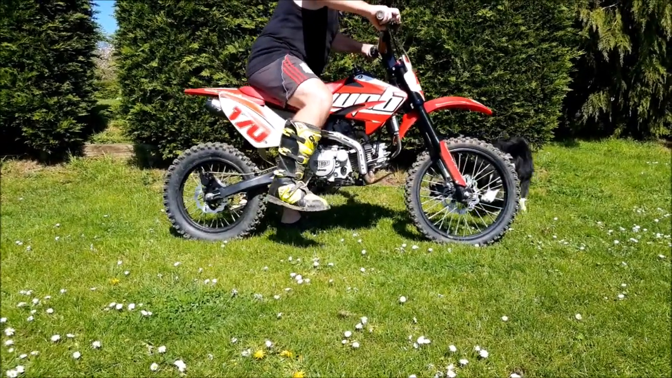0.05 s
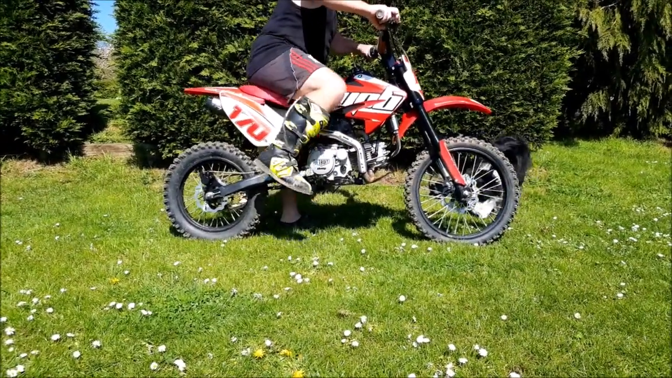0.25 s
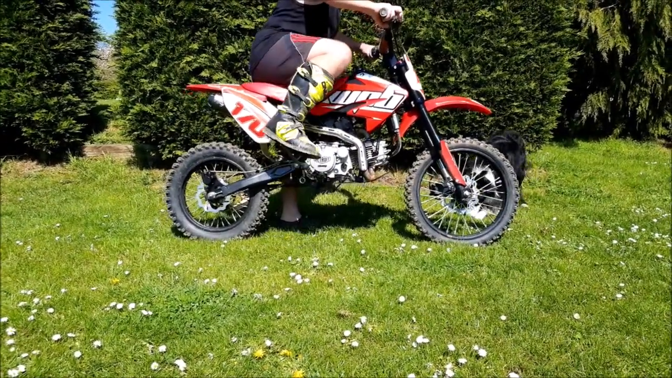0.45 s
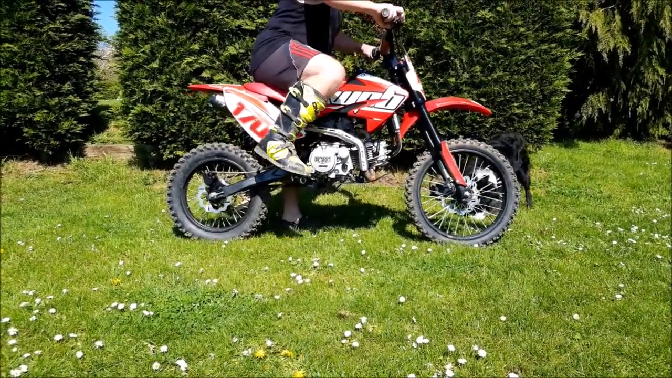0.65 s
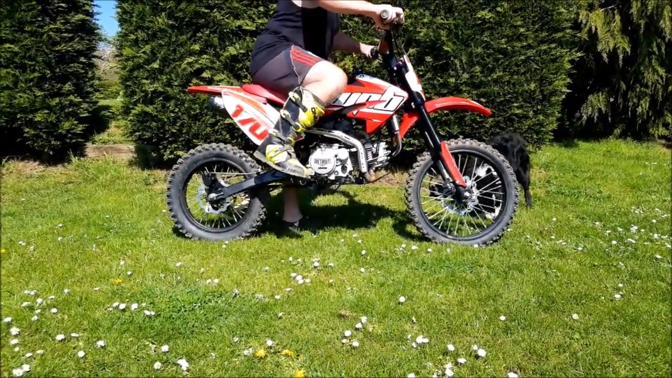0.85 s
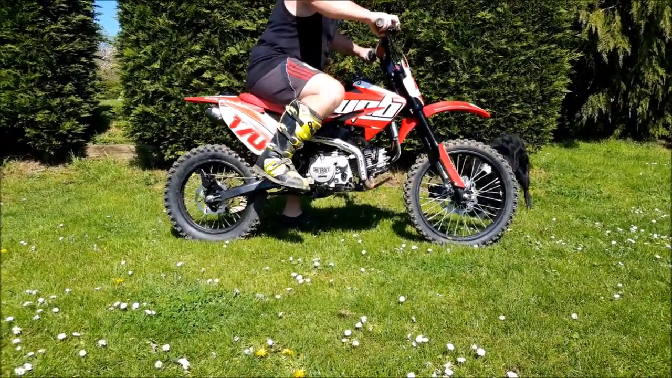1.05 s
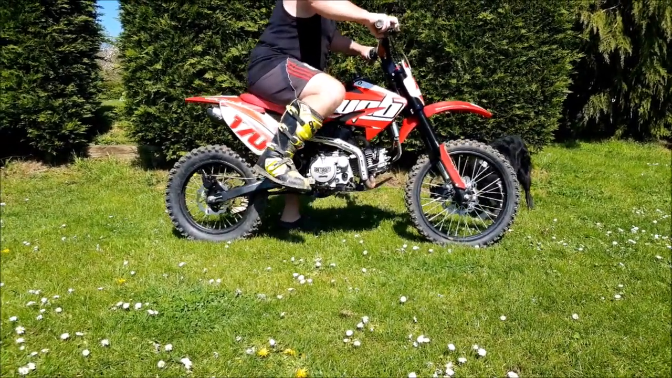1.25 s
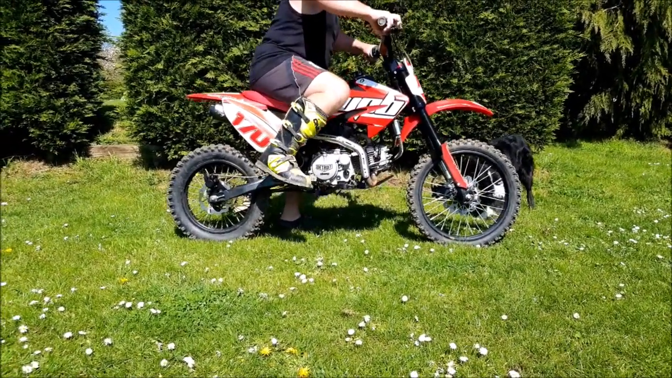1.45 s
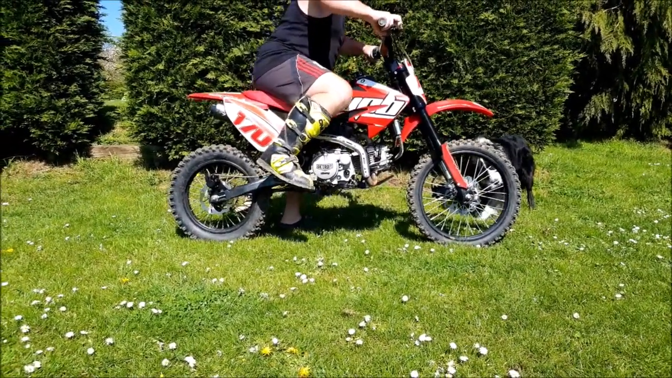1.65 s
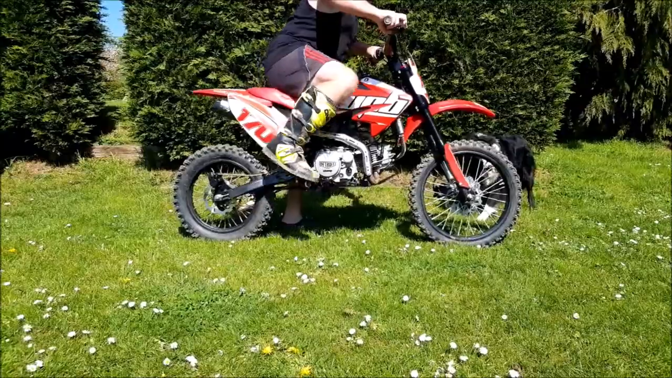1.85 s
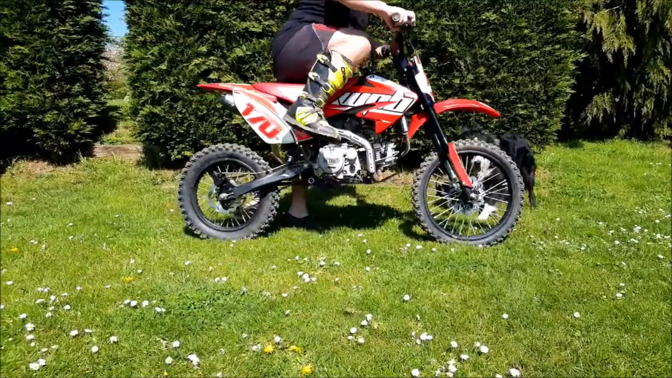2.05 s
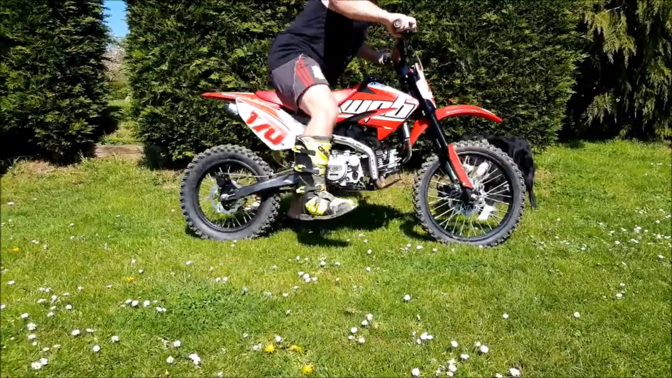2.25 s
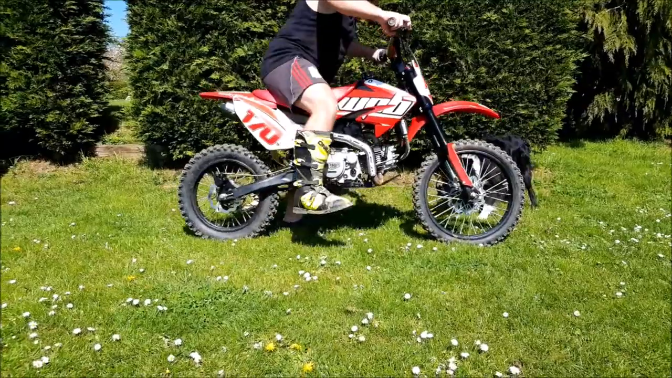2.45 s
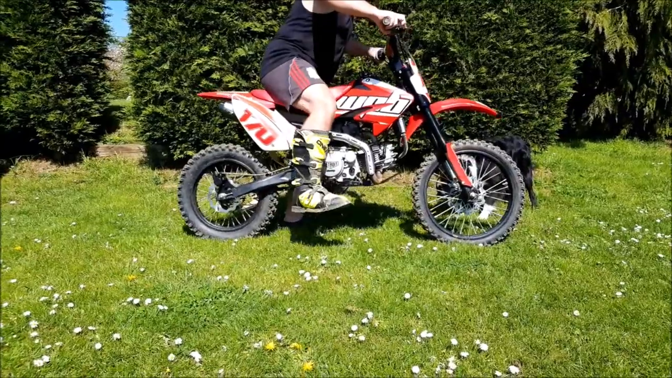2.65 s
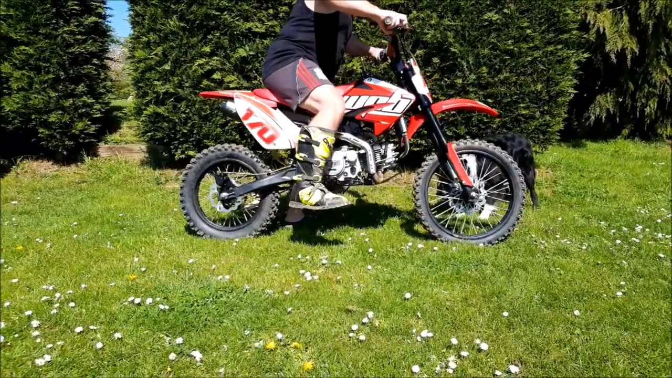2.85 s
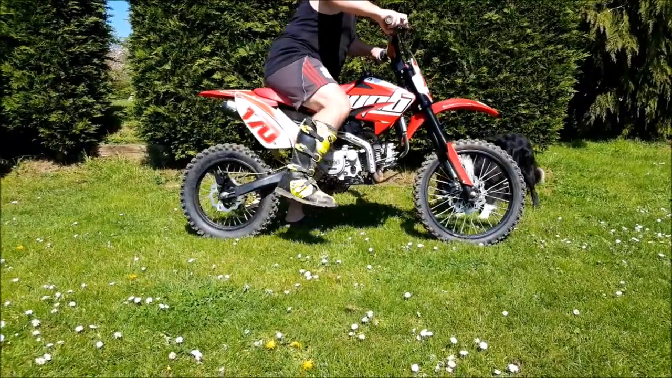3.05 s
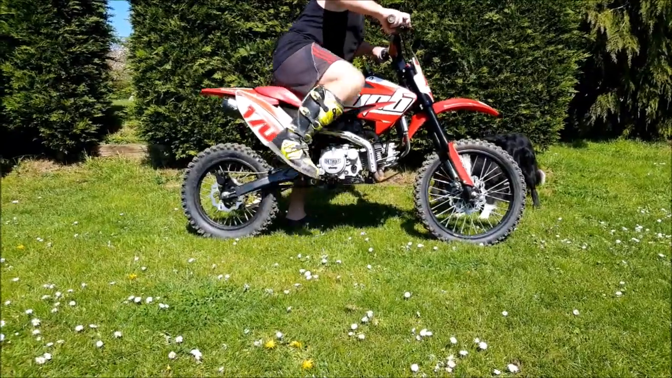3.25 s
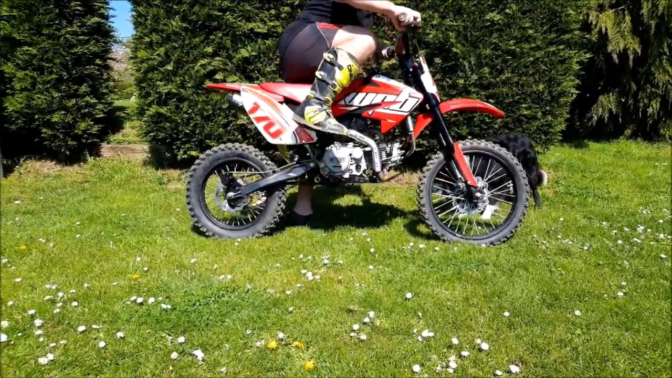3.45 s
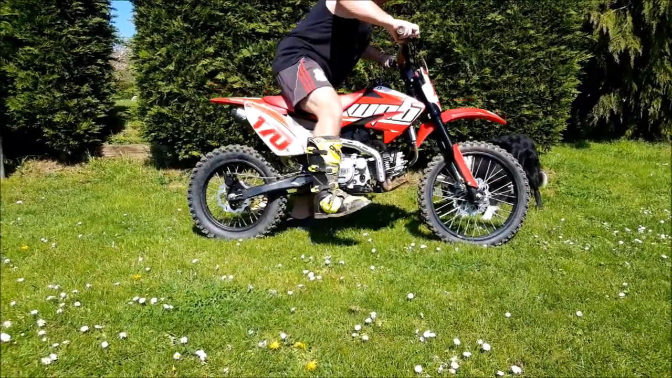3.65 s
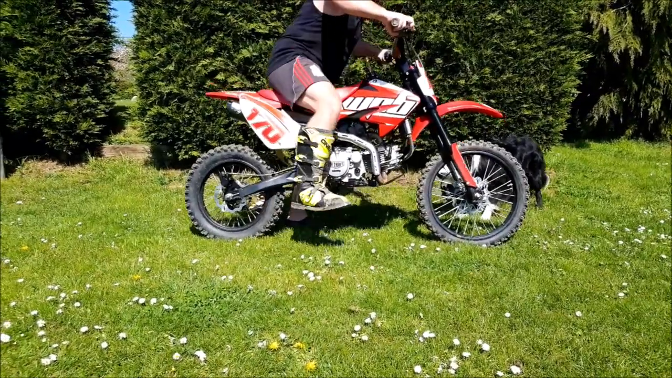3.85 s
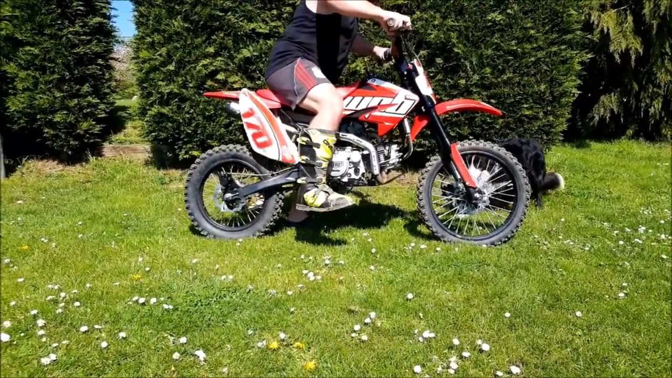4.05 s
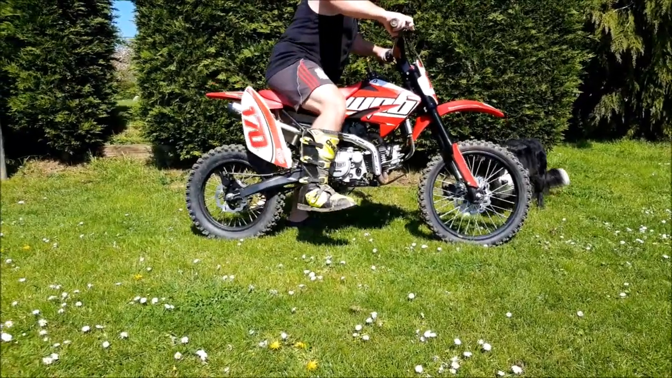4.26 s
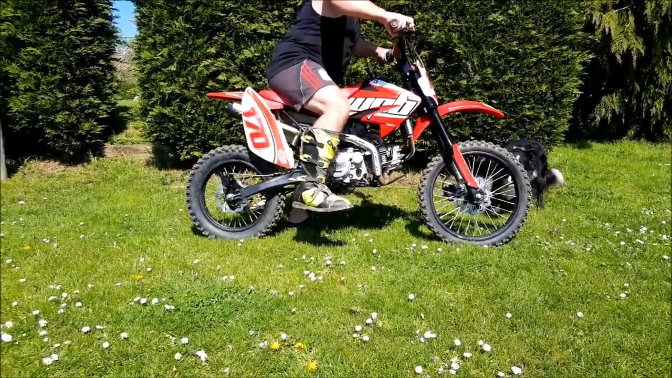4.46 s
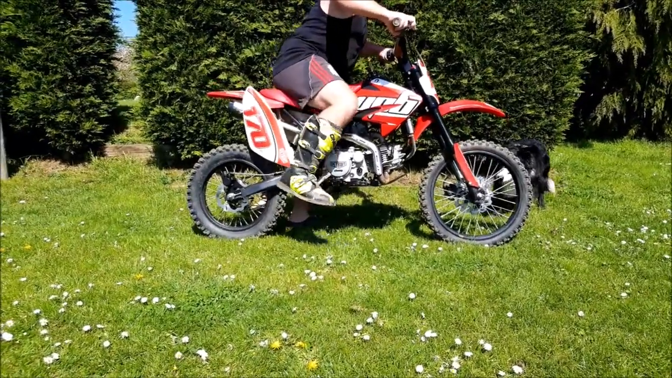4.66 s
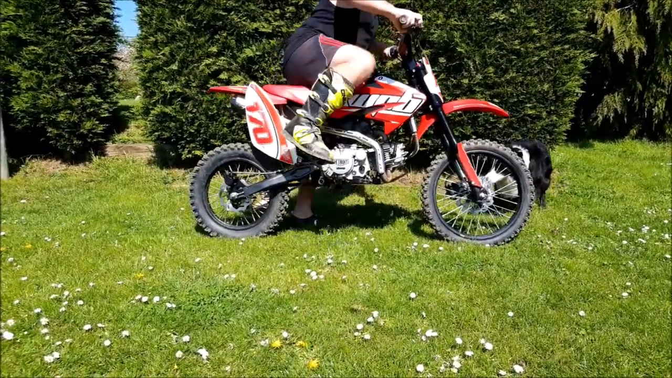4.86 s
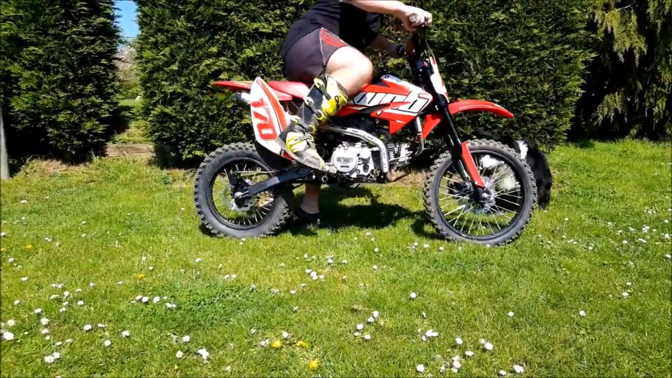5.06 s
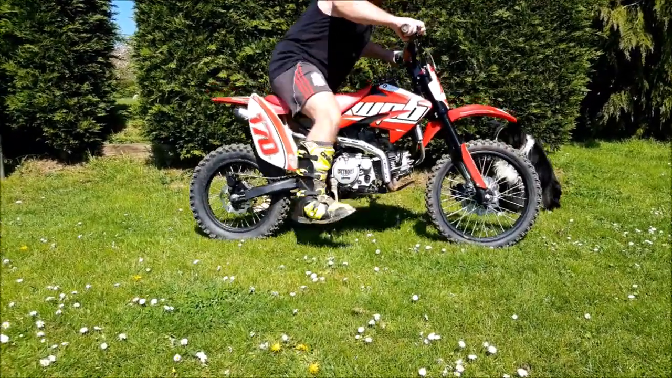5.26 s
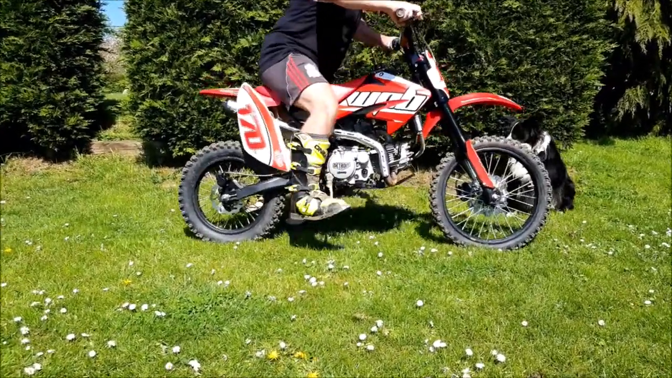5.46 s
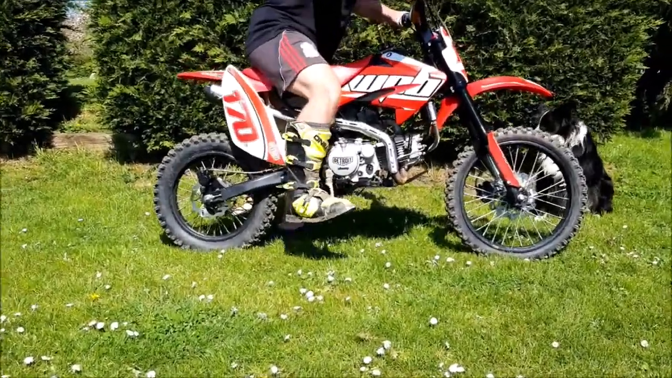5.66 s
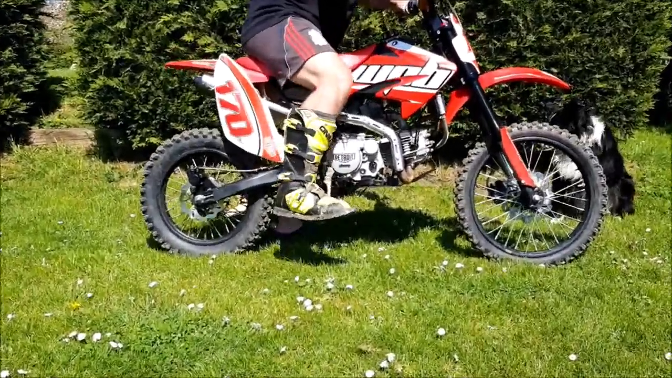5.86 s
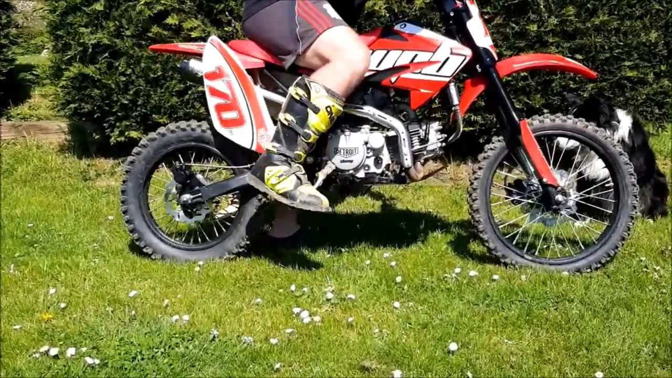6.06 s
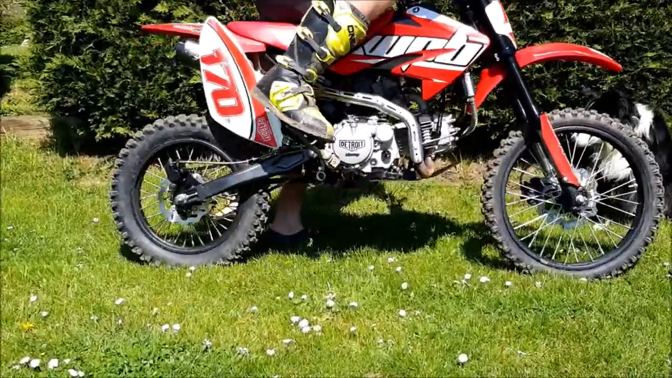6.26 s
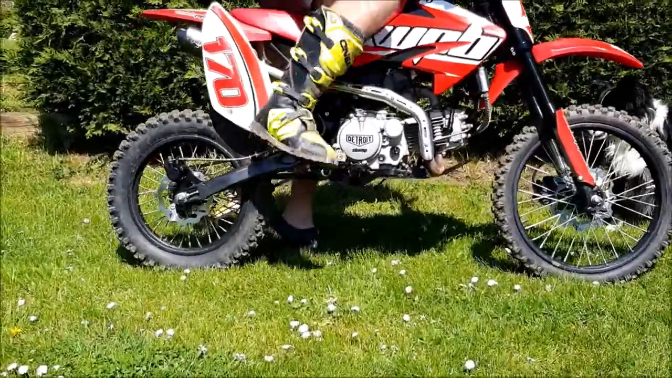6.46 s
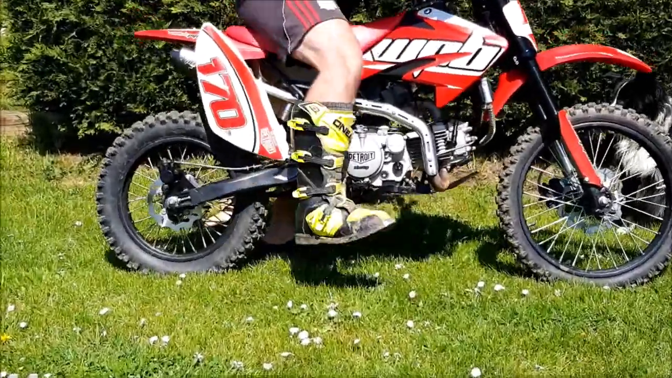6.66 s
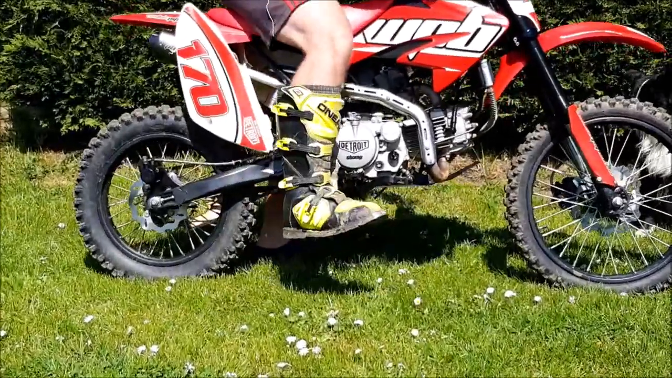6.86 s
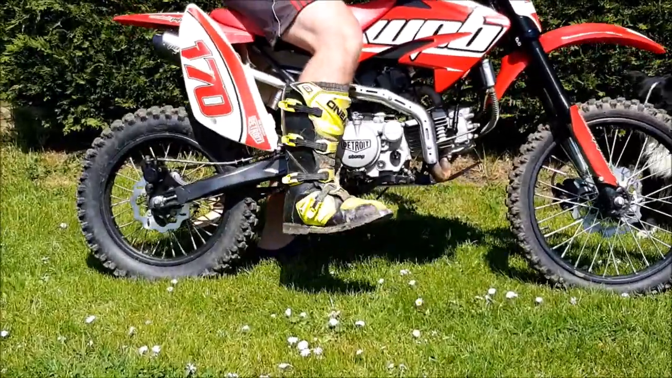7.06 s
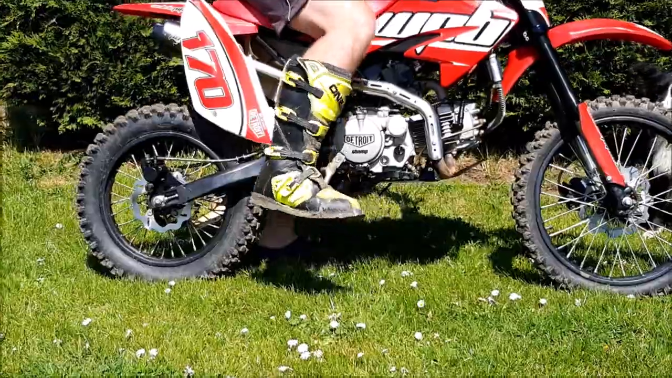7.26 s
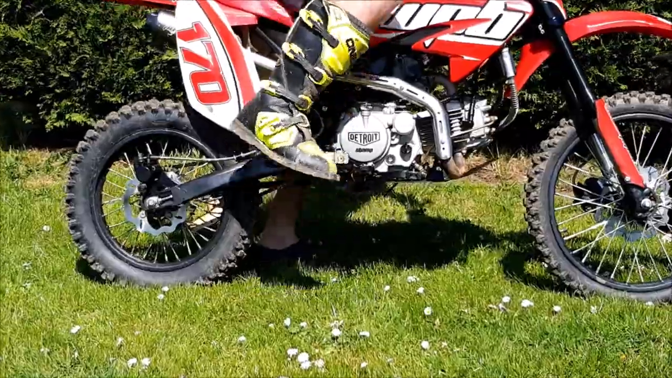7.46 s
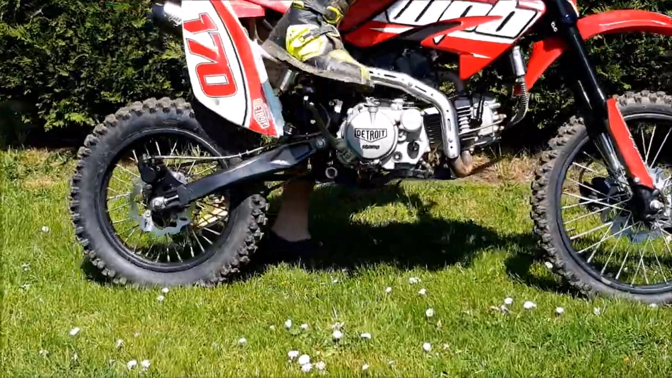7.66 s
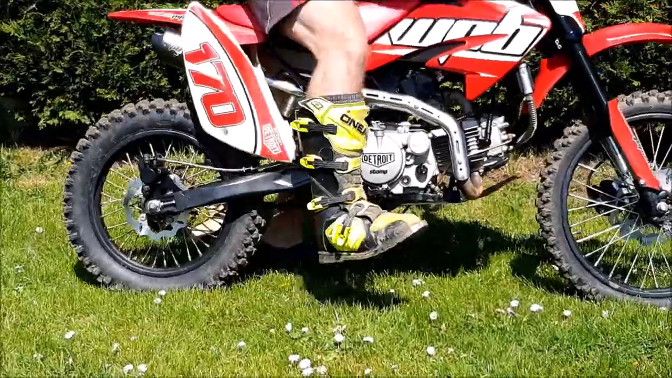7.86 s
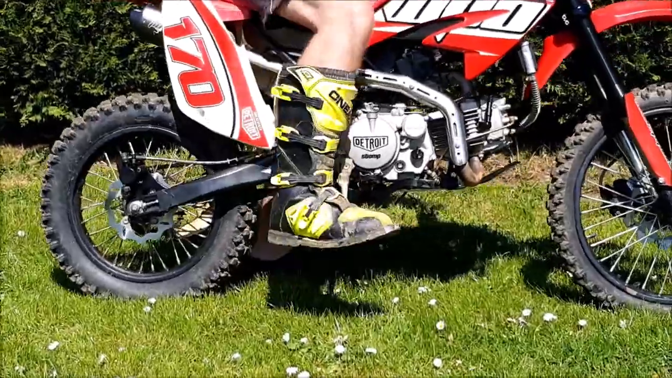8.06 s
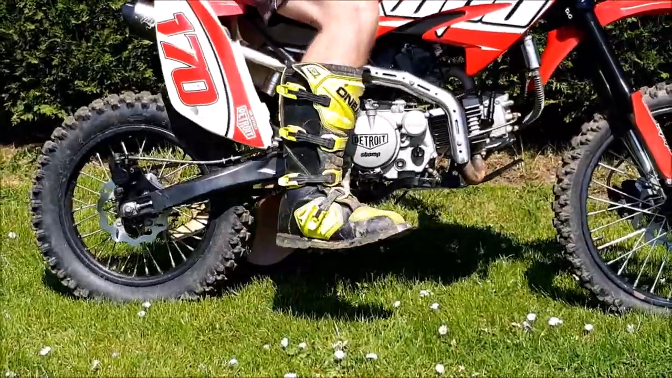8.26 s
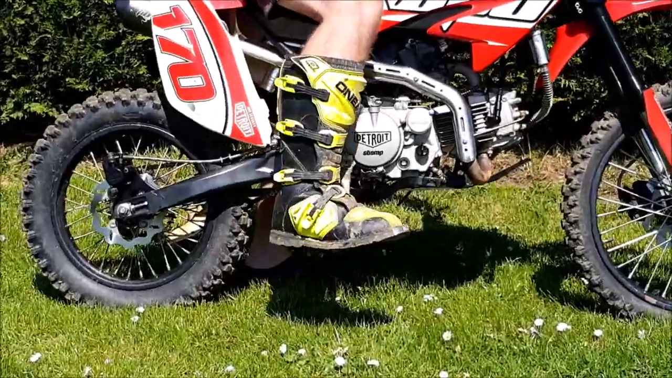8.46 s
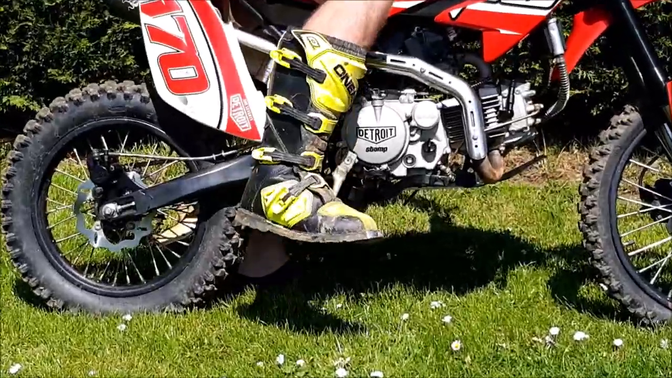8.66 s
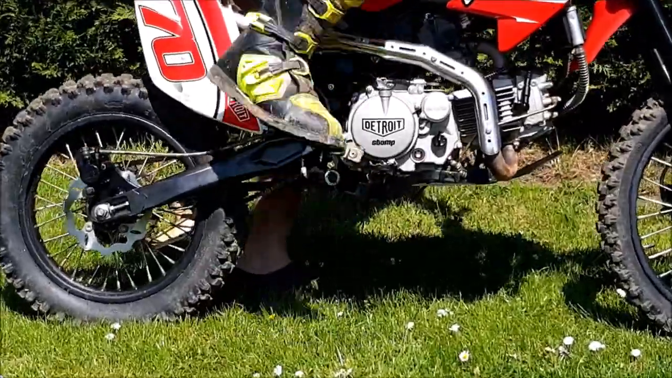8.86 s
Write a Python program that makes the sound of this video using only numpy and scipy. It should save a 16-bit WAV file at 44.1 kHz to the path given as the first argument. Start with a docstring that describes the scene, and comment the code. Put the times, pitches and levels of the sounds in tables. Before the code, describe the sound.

Five kick-starter strokes on a small motorcycle: metal clack, gear whirr, two hollow unfired exhaust gasps, quick stop, with small birds whistling outdoors.

```python
"""Kick-starting a pit bike in vain

A rider kicks over a small single-cylinder pit bike five times on a lawn; it never fires.
Each kick: the starter pawl clacks in, gears and chain whirr (filtered noise and tiny contacts), and two
unfired cycles gasp through the silencer (air surges into resonances) before the crank stops.
The lever ticks between kicks; small birds (gliding whistles) sing over a distant low rumble (noise).
"""
import sys
import numpy as np
from scipy import signal
from scipy.fft import rfft, irfft
from scipy.io import wavfile

SR = 44100
rng = np.random.default_rng(int(sys.argv[2]) if len(sys.argv) > 2 else 0)


def store_pcm(level_fs):
    """Save levels as 16-bit WAV."""
    pcm = np.round(np.clip(level_fs, -1, 1) * 32767).astype(np.int16)
    wavfile.write(sys.argv[1], SR, np.atleast_2d(pcm).T)


N = 392931
TIME = np.arange(N) / SR

# the five kicks: [pawl catches t/s, pawl level/dB, slack knock level/dB, extra whirr under the boot's shove/dB,
# gear whirr level/dB, first gasp t/s, second gasp t/s, gasp level/dB]
KICK_PLAN = [(2.172, -21.5, -19, 3, -41, 2.2662, 2.3552, -1),
             (3.538, -27, -32, 0, -40, 3.6266, 3.7132, -.7),
             (5.064, -28.5, -28, -2, -39.5, 5.1688, 5.2584, -1),
             (6.460, -31, -29, -2, -40.5, 6.5519, 6.6406, -.3),
             (7.728, -32.5, -35, -3, -41, 7.8211, 7.9077, .7)]
# dense overtones of the bike when tapped: [f/Hz, level/dB]
CASING_TONE = [(100, -8.5), (250, 13.5), (400, -8.5), (900, 11), (1200, -15.5), (2000, -11), (3500, -4),
               (5000, -13.5), (6500, -3.5), (9000, -23.5), (11000, -19), (14500, -30)]
SLACK_S = .036  # from the pawl catching until the drive has taken up its slack


def from_db(db):
    """Turn decibels into a gain."""
    return 10 ** (np.asarray(db) / 20)


def rms_one(x):
    """Scale to rms 1."""
    return x / np.sqrt(np.mean(x ** 2) + 1e-20)


def unit(impulse):
    """Scale a response so that it keeps the power of white noise."""
    return impulse / np.sqrt(np.sum(impulse ** 2, axis=-1, keepdims=True))


def in_time(rows):
    """Read each column of a curve at every sample."""
    s, *columns = np.transpose(rows)
    return [np.interp(TIME, s, column) for column in columns]


def drift(per_s):
    """A random wander that heads for a new value per_s times a second."""
    steps = rng.standard_normal(20000)
    return np.interp(TIME * per_s, np.arange(len(steps)), steps)


def response(spectrum, size=4096):
    """An impulse response with the given spectrum and its energy as early as possible (minimum phase)."""
    hz, db = np.transpose(spectrum)
    grid = np.maximum(np.arange(size // 2 + 1) * SR / size, 1)
    grid_db = np.interp(np.log(grid), np.log(hz), db)
    cepstrum = irfft(np.log(from_db(grid_db)))
    # folding the second half onto the first makes the response causal
    cepstrum[1:size // 2] *= 2
    cepstrum[size // 2 + 1:] = 0
    return irfft(np.exp(rfft(cepstrum)))


def through(x, impulse):
    """Pass channels through an impulse response."""
    wet = signal.oaconvolve(np.atleast_2d(x), np.atleast_2d(impulse), axes=-1)
    return wet[:, :x.shape[-1]]


def low_pass(x, cutoff_hz):
    """Dull a sound gently above the cutoff."""
    return signal.sosfilt(signal.butter(1, cutoff_hz, fs=SR, output="sos"), x)


def spread(pair):
    """Two unrelated signals to left and right: alike in the bass, apart in the treble."""
    # likeness of the two ears: [f/Hz, side minus mid level/dB]
    ear_width = [(30, -8), (70, -15), (200, -15), (400, -17), (1270, -18), (2330, -13), (4280, 0),
                 (8000, -1), (14500, 0)]
    side = through(pair[1], response(ear_width))
    return pair[0] + side * [[1], [-1]]


def grains(per_s, size_db):
    """Two trains of tiny contacts of uneven size, at shared moments; rms 1."""
    size = from_db(size_db * np.minimum(rng.exponential(1, N), 4))
    touching = rng.random(N) < per_s / SR
    return rms_one(touching * size * rng.standard_normal((2, N)))


def bike_body(spectrum, ring_db, vary_db=0, size=4096):
    """The bike's answer to a tap: a short crack plus ringing metal; each place of contact favours other modes."""
    # ringing of crankcase, lever and frame: [f/Hz, width/Hz, level/dB]
    metal_modes = [(434.5, 30, 2.5), (700, 414, -3), (935, 49, 9.5), (1377, 36, 2.5), (1502, 14, 0.5),
                   (1844, 68, 2.5), (2284, 27, -7.5), (2694, 38, -0.5), (3160, 79, 5.5), (3840, 46, 0.5),
                   (4130, 64, -4.5)]
    t = np.arange(size) / SR
    place_db = rng.standard_normal(len(metal_modes)) * vary_db
    ringing = 0
    for k, (hz, width, db) in enumerate(metal_modes):
        gain = (-1) ** k * from_db(db + place_db[k]) * width
        ringing = ringing + gain * np.exp(-np.pi * width * t) * np.cos(2 * np.pi * hz * t)
    return unit(unit(response(spectrum)) + from_db(ring_db) * unit(ringing))


def exhaust(repeat_s=0.12, repeat_db=-31):
    """Each unfired cycle sucks air back through the exhaust valve and sets the silencer booming."""
    # air surges as the exhaust valve opens, stands open and shuts:
    # [t/s from the gasp, signed air volume (relative), width/s]
    air_surges = [(-.0032, -0.41, 0.0021), (.0096, -0.29, 0.0015), (.017, .06, .001),
                  (0.0296, 0.038, 0.00089)]
    # silencer resonances: [f/Hz, signed gain, time to fall by 60 dB/s]
    silencer_modes = [(76.7, 0.48, 0.067), (97.68, 0.97, 0.38), (191.8, -1.44, 0.18), (227, -0.58, 0.098),
                      (281, -1.75, 0.15)]
    flow, boom = np.full(N, 1e-18), np.zeros(N)
    for *_, first, second, level_db in KICK_PLAN:
        for gasp in (first, second):
            near = slice(int((gasp - .05) * SR), int((gasp + .08) * SR))
            for delay, volume, width in air_surges:
                surge = np.exp(-.5 * ((TIME[near] - gasp - delay) / width) ** 2)
                flow[near] += from_db(level_db) * volume * surge / surge.sum()
    for hz, gain, t60 in silencer_modes:
        r = np.exp(-np.log(1000) / (t60 * SR))  # what is left of the ringing after one sample
        w = 2 * np.pi * hz / SR
        boom += gain * signal.lfilter([0, np.sin(w)], [1, -2 * r * np.cos(w), r * r], flow)
    # a very faint late repeat of the boom
    faint_repeat = from_db(repeat_db) * np.interp(TIME - repeat_s, TIME, boom)
    return boom + faint_repeat


def gears(churn_db=2.0):
    """Teeth and chain links rattle in uneven bursts, louder as the crank spins up."""
    # frequency bands of the gear whirr, each swelling unevenly: [low f/Hz, high f/Hz, level/dB, contacts per s]
    whirr_bands = [(150, 1120, 1, 500), (1180, 2180, 1, 500), (2680, 4660, -2.5, 1200),
                   (4660, 13000, 1.5, 5000)]
    # gears and chain heard through the crankcase: [f/Hz, level/dB]
    gearbox_tone = [(100, 6), (200, 14), (350, -6.5), (450, 0.5), (700, -1.5), (900, 4), (1180, -11),
                    (1480, 2), (1650, -12), (1950, -0.5), (3200, -5), (5000, -20), (6500, -16.5),
                    (9000, -26.5), (11000, -23), (14500, -29)]
    load = whirr_level() * from_db(churn_db * np.tanh(drift(70)))  # shared by all bands
    force = 0
    for low_hz, high_hz, band_db, per_s in whirr_bands:
        churn = from_db(band_db + 6 * np.tanh(drift(150)))
        hiss = from_db(-7) * rng.standard_normal((2, N))
        teeth = grains(per_s=per_s, size_db=0.0) + hiss
        band = signal.butter(2, [low_hz, high_hz], "band", fs=SR, output="sos")
        force = force + signal.sosfilt(band, load * churn * teeth)
    return through(spread(force), bike_body(gearbox_tone, ring_db=-13))


def whirr_level():
    """The gears turn loosely once the pawl catches, are driven through both gasps, then coast and stop."""
    loose_db, slowing_db, coast_db = -7.5, -3, -13  # relative to the drive at the first gasp
    spin_up_s, overrun_s, run_down_s, coast_s = 0.022, 0.031, 0.052, 0.048
    stop_db_per_s = 157
    level = 0
    for pawl, _, _, shove_db, whirr_db, first, second, _ in KICK_PLAN:
        taut, released = pawl + SLACK_S, second + overrun_s
        coasting = released + run_down_s
        moments = [taut, taut + spin_up_s, first, released, coasting]
        db = np.interp(TIME, moments, [loose_db, shove_db, 0, slowing_db, coast_db])
        stopping_db = stop_db_per_s * np.clip(TIME - coasting - coast_s, 0, 1)
        level = level + (TIME > pawl) * from_db(whirr_db + db - stopping_db)
    return level + 1e-18


def knocks(bounce_s=0.0037, clack_s=0.0047, rise_s=.0018):
    """Each knock is a few milliseconds of chatter at its own place on the bike; hard steel adds a bright clack."""
    # hard steel contact: [f/Hz, level/dB]
    steel_tone = [(2000, -62), (4500, -7), (6500, 9), (9000, -2), (11500, -2), (14500, -9.5)]
    out = np.zeros((2, N + SR))
    t = TIME[:SR // 8]
    rise = 1 - np.exp(-t / rise_s)
    steel = unit(response(steel_tone))
    for s, level_db, treble_db in blows():
        chatter = spread(rise * rng.standard_normal((2, len(t))))
        body = bike_body(CASING_TONE, ring_db=3.0, vary_db=9.5)
        thud = from_db(level_db) * through(chatter * np.exp(-t / bounce_s), body)
        clack = from_db(level_db + treble_db) * through(chatter * np.exp(-t / clack_s), steel)
        at = int((s - rise_s) * SR)
        out[:, at:at + len(t)] += thud + clack
    return out[:, :N]


def blows(pawl_treble_db=-9, slack_treble_db=-20):
    """List every knock as (s, level dB, relative treble dB): the sequence in each kick, and the lone ones."""
    # lone knocks between kicks, mostly of boot and lever; the one at 4.099 s falls on a tock of the settling
    # mechanism: [t/s, level/dB, relative treble level/dB]
    lone_knocks = [(.16, -33.5, -25), (.23, -33.5, -15.5), (.639, -42, -20), (1.242, -34.5, 3),
                   (2.618, -41.5, -15), (3.385, -45.5, -18), (4.099, -49.5, -12), (4.848, -40, -15),
                   (6.321, -46, -12.5), (6.784, -44, -22), (8.891, -38, -18)]
    # knocks of every stroke: piston meets compression, valve shuts, lever hits its stop, valve shuts again,
    # crank rocks back: [t/s from the first gasp, scatter/s, level above the whirr/dB, relative treble level/dB]
    stroke_knocks = [(-.012, .004, 8, -28), (.016, .001, 12, -13), (.058, .006, 10, -16),
                     (.109, .005, 7, -11), (.22, .014, 2, -23)]
    rows = list(lone_knocks)
    for pawl, pawl_db, slack_db, _, whirr_db, first, _, _ in KICK_PLAN:
        # the pawl clacks brightly; then the drive takes up its slack with a duller knock
        rows.append((pawl, pawl_db, pawl_treble_db))
        rows.append((pawl + SLACK_S, slack_db, slack_treble_db))
        for delay, scatter, db, treble_db in stroke_knocks:
            s = first + delay + scatter * rng.uniform(-1, 1)
            rows.append((s, whirr_db + db, treble_db))
    return rows


def tocks(ring_hz=1000, ring_s=0.0045):
    """Dull contacts, as the mechanism settles, that wake only one short resonance."""
    # runs of soft hollow tocks: [t/s, count, spacing/s, first level/dB, loss per tock/dB]
    tock_runs = [(4.024, 3, 0.074, -47, 7.5), (4.35, 3, 0.053, -61.5, -2.5), (8.164, 3, .049, -54, -0.5)]
    t = TIME[:SR // 20]
    envelope = (1 - np.exp(-t / 0.001)) * np.exp(-t / ring_s)
    out = np.zeros(N)
    for s, count, spacing, first_db, loss_db in tock_runs:
        for k in range(round(count)):
            hz = ring_hz * (1 + 0.044 * rng.standard_normal())
            at = int((s + k * spacing) * SR)
            out[at:at + len(t)] += from_db(first_db - k * loss_db) * envelope * np.sin(2 * np.pi * hz * t)
    return out


def ratchet(dull_hz=3200):
    """Light ticks from several places of the starter, each with its own ring, dulled by the crankcase."""
    level = lever_motion()
    ticks = 0
    for _ in range(8):  # places of contact
        contacts = spread(level * grains(per_s=13, size_db=.5))
        ticks = ticks + through(contacts, bike_body(CASING_TONE, ring_db=2.0, vary_db=6.5))
    return low_pass(ticks, dull_hz)


def lever_motion(fade_s=0.076):
    """Level of the slow movements of the starter: eased round to compression, settling after a stroke."""
    # the lever is eased round, ratchet and chain ticking faintly: [t/s, length/s, level/dB]
    lever_easings = [(.1, 0.3, -68.5), (1.7, 0.36, -73.5), (3.06, 0.44, -77.5), (4.58, 0.43, -73.5),
                     (5.9, 0.523, -73), (7.06, 0.68, -74), (8.62, .4, -74.5)]
    settle_after_s, settle_s, settle_db = .25, 0.28, -79.5
    moves = list(lever_easings)
    moves += [(first + settle_after_s, settle_s, settle_db) for *_, first, _, _ in KICK_PLAN]
    level = 0
    for s, length, db in moves:
        to_nearest_end = np.minimum(TIME - s, s + length - TIME)
        level = level + from_db(db) * np.clip(to_nearest_end / fade_s, 0, 1)
    return level


def rustle(easing_boot_db=-7):
    """Soft grainy swells as the rider shifts leg and boot; the boot also brushes along with the lever."""
    # boot and clothing brushing the bike: [t/s, length/s, level/dB]
    shifts = [(0.028, .31, -63), (0.583, 0.13, -64), (0.945, 0.26, -65), (1.84, 0.19, -60.5),
              (2.09, 0.37, -55.5)]
    # tone of the brushing cloth: [f/Hz, level/dB]
    cloth_tone = [(150, 5.5), (320, 9), (550, 7), (1200, -4), (1900, -4.5), (4000, -7.5), (12000, -18)]
    swell = from_db(easing_boot_db) * lever_motion()
    for s, length, db in shifts:
        swell = swell + from_db(db) * np.sin(np.pi * np.clip((TIME - s) / length, 0, 1))
    force = swell * from_db(4 * np.tanh(drift(40))) * grains(per_s=2700, size_db=-1.5)
    return through(spread(force), unit(response(cloth_tone)))


def birds(bend=1.4):
    """Warbling whistles glide fast, then flatten; paths through the foliage make them flutter in each ear."""
    out = np.zeros((2, N + SR))
    for s, length, start_hz, end_hz, level_db in syllables():
        u = np.linspace(0, 1, int(length * SR))  # progress through the note
        warble = 1 + .015 * np.interp(u, np.linspace(0, 1, 12), rng.standard_normal(12))
        glide = np.expm1(-bend * u) / np.expm1(-bend)
        hz = warble * (start_hz + (end_hz - start_hz) * glide)
        ear_phase = rng.normal(0, 1, (2, 1)) * start_hz / 5000
        phase = 2 * np.pi * np.cumsum(hz) / SR + ear_phase
        swell = np.sqrt(2 * np.abs(np.sin(np.pi * u)))
        at = int(s * SR)
        out[:, at:at + len(u)] += from_db(level_db) * swell * np.sin(phase)
    each_ear_db = 5 * np.tanh([drift(300), drift(300)])
    both_ears_db = 2.5 * np.tanh(drift(90))
    return out[:, :N] * from_db(each_ear_db + both_ears_db)


def syllables(scatter_octaves=0.47, scatter_db=3):
    """List every bird note as (s, length s, start Hz, end Hz, dB): whistles, runs, calls, random far twitter."""
    # single slurred whistles: [t/s, length/s, start f/Hz, end f/Hz, level/dB]
    slurs = [(0, 0.033, 5900, 5000, -57), (.11, 0.072, 4470, 3020, -53.5), (.436, 0.065, 2910, 2490, -60),
             (.82, 0.092, 5130, 2960, -56), (.972, 0.027, 1404, 1380, -52),
             (1.09, 0.072, 4520, 3580, -60.5), (1.416, 0.036, 4400, 3200, -62.5),
             (2.92, 0.091, 2910, 2370, -67), (3.01, 0.098, 4570, 3150, -67),
             (3.15, 0.22, 2330, 2060, -77.5), (3.268, 0.09, 4610, 3150, -61),
             (3.96, 0.065, 4920, 4510, -65), (4.651, 0.032, 5000, 5450, -68.5),
             (5.954, 0.12, 4701, 2910, -63.5), (6.942, .09, 3770, 3590, -64.5),
             (8.794, 0.097, 3780, 3620, -61)]
    # runs of gliding notes: [t/s, count, spacing/s, note length/s, start f/Hz, end f/Hz, level/dB]
    note_runs = [(.063, 3, .103, .068, 6700, 4600, -57), (1.462, 5, .085, .028, 4900, 3050, -58),
                 (3.593, 4, .106, .062, 6350, 4650, -57), (3.985, 3, .08, .022, 4000, 2900, -68),
                 (5.47, 3, .06, .03, 4400, 5500, -71), (7.37, 4, .088, .055, 7100, 5000, -63)]
    # another bird repeats one high two-note call: [t/s, level/dB]
    calls = [(0.419, -65), (1.105, -65.5), (2.78, -71.5), (3.23, -74), (4.07, -73.5), (5.617, -71),
             (6.086, -68.5), (7.208, -67.5), (8.45, -73)]
    # its two notes: [t/s into the call, length/s, start f/Hz, end f/Hz, relative level/dB]
    call_notes = [(0, 0.044, 6630, 6160, 3.5), (0.099, 0.035, 5360, 5750, -1)]
    # far birds: short rising notes, scattered around this pitch and level
    twitters_per_s, twitter_s, twitter_hz, twitter_rise, twitter_db = 7.7, 0.033, 4240, 1.1, -78
    notes = list(slurs)
    for s, count, spacing, length, start_hz, end_hz, db in note_runs:
        notes += [(s + k * spacing, length, start_hz, end_hz, db) for k in range(round(count))]
    for s, db in calls:
        for delay, length, start_hz, end_hz, note_db in call_notes:
            notes.append((s + delay, length, start_hz, end_hz, db + note_db))
    twitter_count = round(twitters_per_s * N / SR)
    for when, pitch, strength in rng.uniform(-1, 1, (twitter_count, 3)):
        hz = twitter_hz * 2 ** (scatter_octaves * pitch)
        db = twitter_db + scatter_db * strength
        notes.append((abs(when) * N / SR, twitter_s, hz, hz * twitter_rise, db))
    return notes


def garden():
    """Far traffic rumble, open air and the hiss of leaves: three coloured noises with changing levels."""
    # background levels: [t/s, rumble level/dB, air level/dB, leaf hiss level/dB]
    garden_levels = [(0, -54, -67.5, -76.5), (2.1, -53.5, -69, -77), (2.75, -53, -77, -83.5),
                     (3.1, -62.5, -73, -83), (4.3, -64.5, -77.5, -83.5), (5.2, -60, -70.5, -82.5),
                     (7.3, -61.5, -75, -81.5), (8.4, -57.5, -80, -86.5)]
    # tone of the far rumble: [f/Hz, level/dB]
    rumble_tone = [(12, -70), (20, -23), (43, -3), (59, 6.5), (80, -8.5), (107, 6.5), (123, 0.5),
                   (141, -13.5), (190, -17), (303, -25), (350, -44), (460, -46), (770, -120)]
    # tone of the open air: [f/Hz, level/dB]
    air_tone = [(150, -3.5), (300, -4.5), (600, -11.5), (1200, -16.5), (2400, -17), (5000, -15),
                (7000, -19.5), (9000, -30.5)]
    # tone of the leaves: [f/Hz, level/dB]
    leaf_tone = [(1500, -20), (4000, 6), (7000, -6.5), (9000, -7.5), (12000, 4), (14500, -2.5)]
    out = 0
    for spectrum, db in zip([rumble_tone, air_tone, leaf_tone], in_time(garden_levels)):
        noise = spread(rng.standard_normal((2, N)))
        out = out + from_db(db) * through(noise, unit(response(spectrum)))
    return out


def hedges(x, t60, wet_db, dull_hz, delay_s):
    """Add the diffuse scatter from hedges and lawn: a dulled noise tail that builds up and dies away."""
    t = TIME[:SR]
    build_up = 1 - np.exp(-(t / delay_s) ** 2)
    tail = rng.standard_normal((2, SR)) * from_db(-60 * t / t60) * build_up
    tail = low_pass(unit(spread(tail)), dull_hz)
    return x + from_db(wet_db) * through(x, tail)


def scene():
    """The bike, its sound reaching the left ear first; birds with strong scatter from the hedges; the garden."""
    boom = hedges(exhaust(), t60=0.67, wet_db=-22.0, dull_hz=1970, delay_s=0.0043)
    bike = gears() + knocks() + tocks() + ratchet() + rustle()
    metal = hedges(bike, t60=.45, wet_db=-16, dull_hz=5000, delay_s=.01)
    song = hedges(birds(), t60=.3, wet_db=-5, dull_hz=12000, delay_s=.012)
    left, right = (boom + metal) * from_db([[.2], [-.2]])
    right_later = np.r_[0, right[:-1]]  # by one sample
    return np.array([left, right_later]) + song + garden()


def record(dry):
    """Cut the top steeply above 14450 Hz."""
    return signal.sosfilt(signal.ellip(12, .2, 80, 14450, fs=SR, output="sos"), dry)


dry = scene()
out = record(dry)
store_pcm(out)
```